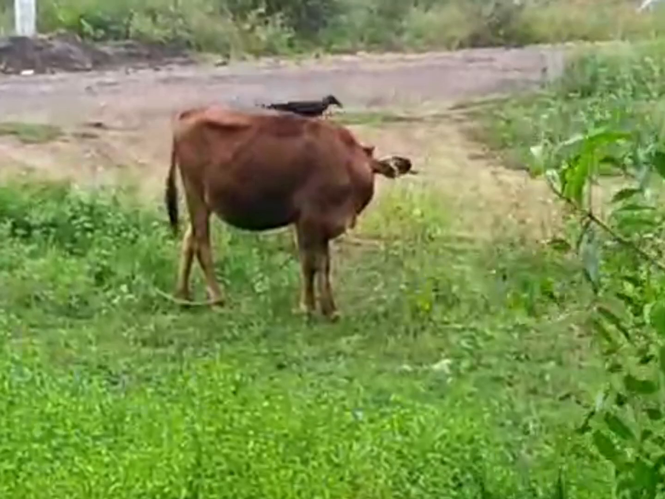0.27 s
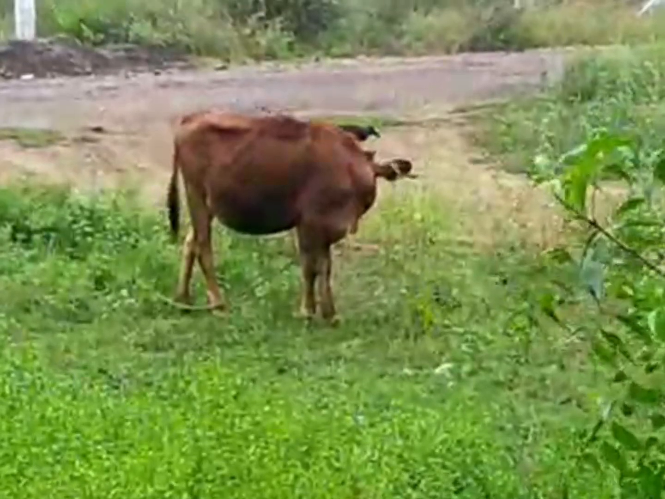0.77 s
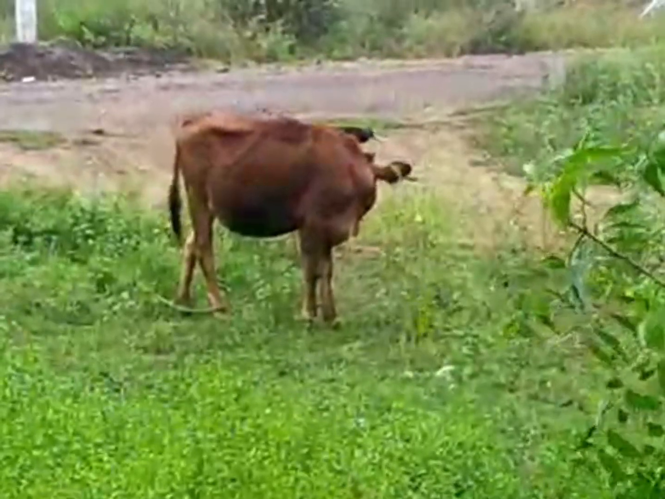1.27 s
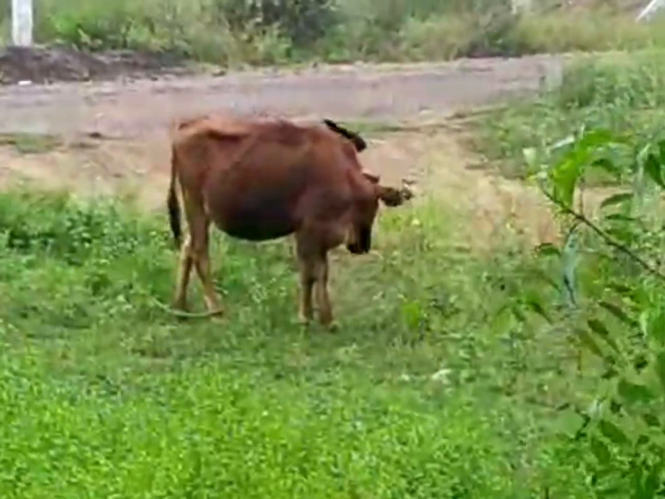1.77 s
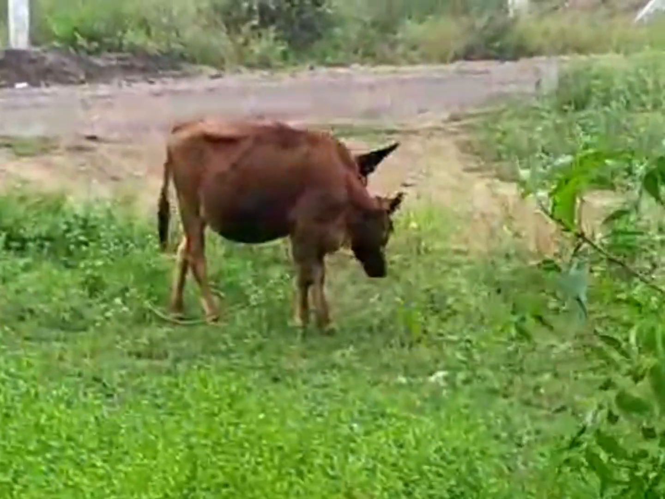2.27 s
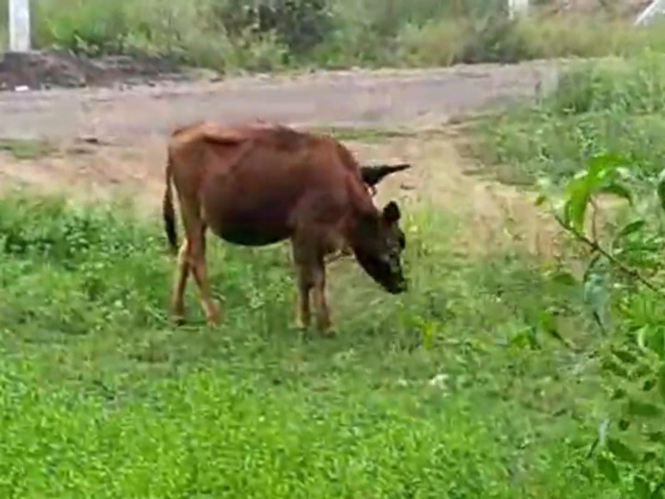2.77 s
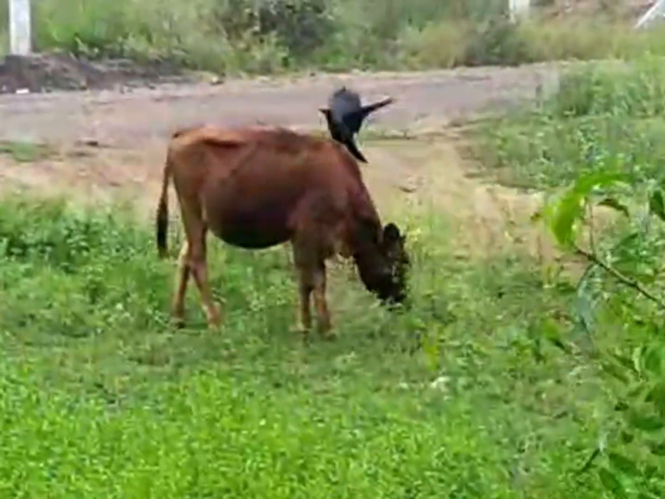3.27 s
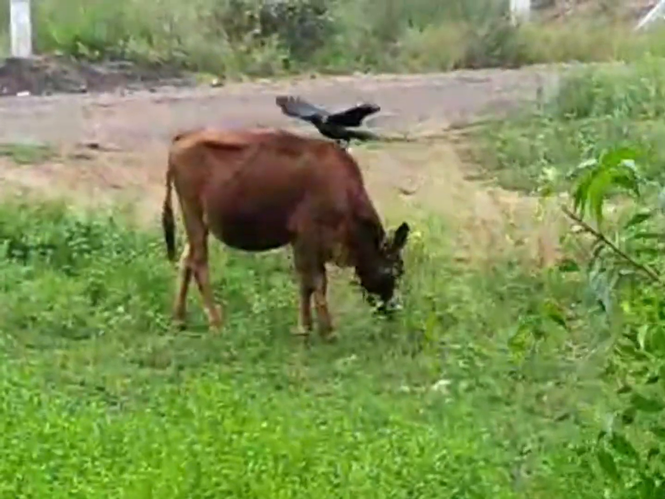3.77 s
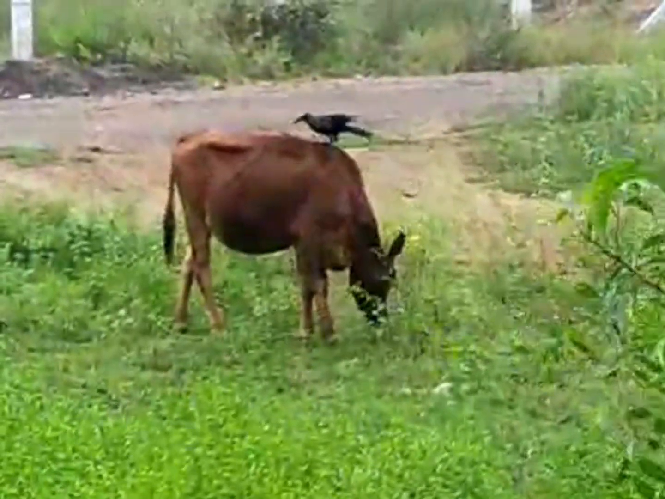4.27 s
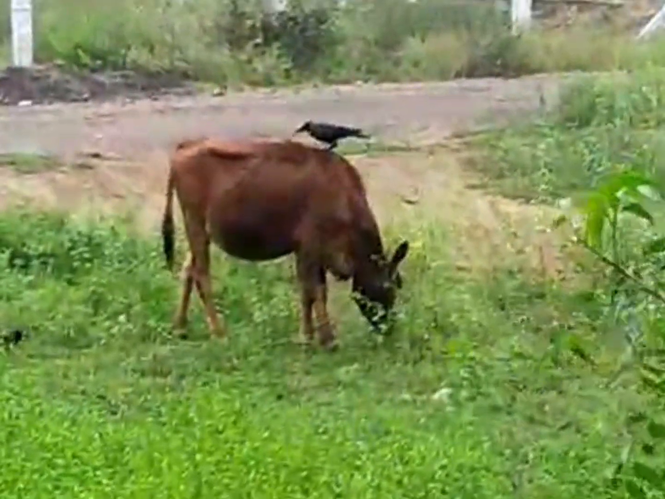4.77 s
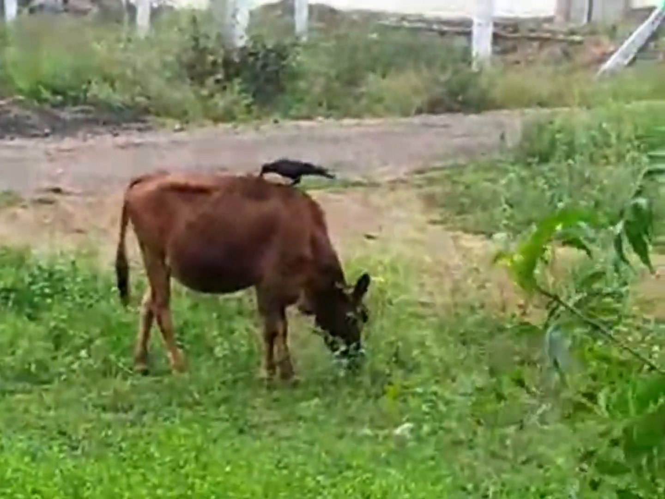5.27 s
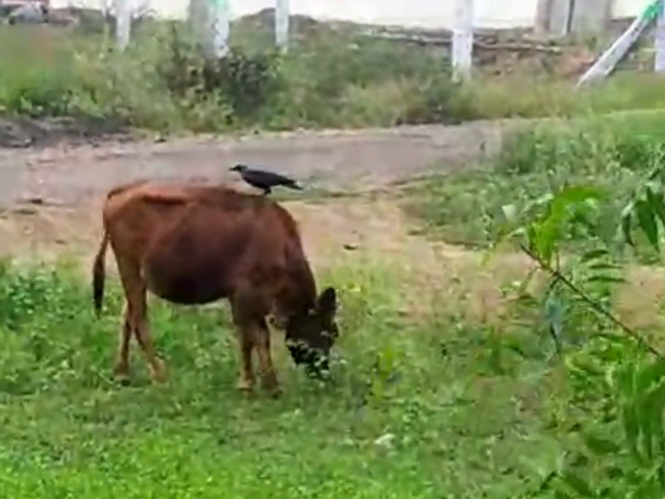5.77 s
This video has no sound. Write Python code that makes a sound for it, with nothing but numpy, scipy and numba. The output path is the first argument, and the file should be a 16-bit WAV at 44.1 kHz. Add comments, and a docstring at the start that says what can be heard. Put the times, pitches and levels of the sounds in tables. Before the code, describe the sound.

A steady, high hiss of insects fills an open grassy field for all six seconds, over the slow, low throb of a heavy engine some way off. Small birds give faint, short whistles during the first 1.5 seconds. Close by, water drips at irregular moments, making hollow plinks and small crackles on leaves; the clearest plinks fall near 2, 2.5 and 3.4 seconds. Wind touches the microphone lightly at first, then buffets it with deep, hard thumps from about 2.6 to 4.7 seconds. The engine grows louder from around 3.7 seconds, its roar becoming brighter as the vehicle nears. A brief leafy spatter comes at about 4.3 seconds. In the last second the wind eases, the insects swell briefly, and faint whines and a few short, raspy bird calls sound over the engine.

```python
"""A slow, heavy engine throbs under a hissing chorus of insects, in a grassy field after rain.
Both are pulse trains driving resonators: firings ring an exhaust, wing clicks ring wings. Small birds
whistle far off, and water drips close by, exciting the modes of something hollow and crackling on
leaves. The vehicle's roar grows louder and brighter as it nears, while eddies of wind buffet and thump
the two ports of a small microphone."""
import sys
import numpy as np
from scipy import signal
from scipy.fft import rfft, irfft
from scipy.io import wavfile
from scipy.ndimage import uniform_filter1d
from numba import njit

SR = 44100
rng = np.random.default_rng(int(sys.argv[2]) if len(sys.argv) > 2 else 0)


def transcribe(signal):
    """Save signal, clipped to [-1, 1], as a 16-bit WAV file at the path in sys.argv[1]."""
    frames = np.atleast_2d(signal).T
    limited = np.clip(frames, -1, 1)
    pcm = np.round(limited * 32767).astype(np.int16)
    wavfile.write(sys.argv[1], SR, pcm)


N = 266055
T = np.arange(N) / SR
HZ = np.maximum(np.arange(N // 2 + 1) * SR / N, 1)

# The engine under changing load. Each row: time in seconds, level in dB, exhaust resonance in Hz.
ENGINE_LOAD = [(0.08, -26, 99.4), (0.5, -24.5, 109.7), (1.25, -28.5, 102.8), (1.4, -24, 79.7),
               (1.65, -23.5, 78), (1.85, -31.5, 79.1), (2.15, -29.5, 101.6), (2.6, -28, 102.4),
               (3.4, -28.5, 83.4), (3.6, -23, 80.2), (3.8, -17, 80.6), (4.25, -16.5, 78.7),
               (4.45, -19, 96.7), (4.75, -23, 103), (4.95, -17.5, 101.9), (5.4, -18.5, 102.2),
               (5.75, -16, 101.3), (6.03, -19, 99.3)]
# Wing resonances. Each row: centre in Hz, width in Hz, relative level in dB, depth of throb in dB.
WING_MODES = [(6727, 650, -2, .8), (7240, 600, -6, .8), (5200, 600, -15, 1.8)]
# Envelopes of the insects, the roar and the wet leaves. Each row: time in seconds, level in dB.
CHORUS_LEVEL = [(0.1, -36.5), (1.3, -36.5), (2.2, -36), (2.7, -34.5), (4.9, -35.5), (5.4, -31),
                (5.75, -34.5), (6.03, -38.5)]
ROAR_LEVEL = [(0.3, -37.5), (2.09, -36), (2.41, -31.5), (3.4, -30.5), (4.03, -27), (4.55, -26), (4.9, -25),
              (5.4, -25), (5.75, -24), (5.9, -24), (6.03, -23)]
LEAF_LEVEL = [(0.3, -51.5), (2.0, -51.5), (3.6, -47.5), (4.1, -44.5), (4.8, -42), (5.15, -40), (6.03, -40)]
# Noise spectra of field, roar and leaves. Each row: frequency in Hz, relative spectral density in dB.
FIELD_SPECTRUM = [(24, -36), (40, -29), (91, -4.5), (131, -7), (250, -20), (400, -20), (900, -30),
                  (1400, -37.5), (2500, -33.5), (3200, -41), (4300, -43), (5200, -44.5), (5900, -43.5),
                  (8300, -64), (9000, -90)]
ROAR_SPECTRUM = [(59, -42), (110, -14), (170, -13.5), (250, -20.5), (500, -26), (700, -21.5), (900, -23.5),
                 (1200, -20), (1800, -23), (2500, -22.5), (3300, -30.5), (4500, -31), (5700, -35.5),
                 (6900, -31), (8300, -45.5), (9000, -80)]
LEAF_SPECTRUM = [(9000, -56), (10300, -18.5), (10900, -13.5), (11500, -11.5), (12500, -8), (13500, -7.5),
                 (15500, -8)]
# Resonant vehicle panels. Each row: centre in Hz, width in Hz, level against the roar in dB.
PANEL_MODES = [(395, 100, -16), (657, 34, -18), (1334, 18, -23.5), (1552, 30, -28), (1663, 25, -23),
               (1862, 45, -19), (1940, 35, -21), (2177, 87, -15), (2393, 68.2, -24.5)]
# Stereo width of the background noise: narrow in the bass, almost mono near 12 kHz.
# Each row: frequency in Hz, side minus mid in dB.
SIDE_SPECTRUM = [(60, -9.5), (110, -18.5), (200, -7), (380, -8), (700, -7), (1290, -3), (2380, -4.5),
                 (4400, 0.5), (7500, -1), (9000, -3), (12000, -37), (13500, 1)]
# Buffets of wind. Each row: time of full strength in seconds, level in dB, hold in seconds.
WIND_BUFFETS = [(0.21, -34, .02), (0.48, -25, .02), (0.85, -25.5, 0.061), (1.595, -27, 0.015),
                (2.35, -23, 0.18), (2.653, -18.5, 0.11), (2.95, -18.5, .01), (3.083, -18, .05),
                (3.273, -20.5, 0.18), (3.495, -17, 0.015), (3.862, -17.5, 0.06), (4.183, -21, 0.0083),
                (4.388, -23, 0.026), (4.557, -16.5, 0.11), (5.048, -23, 0.029), (5.657, -27, 0.069),
                (5.959, -35, 0.017)]
# Bird whistles. Each row: start and length in seconds, first, turning and last pitch in Hz,
# level in dB, how far to the side from 0 to 1.
BIRD_WHISTLES = [(0.105, .03, 3400, 3400, 3400, -48, 0), (0.415, .035, 4900, 4850, 4350, -53, 0),
                 (0.803, .03, 4200, 4450, 5750, -47, 0), (0.815, .026, 4300, 4450, 5150, -50, 0),
                 (0.96, .062, 2850, 2900, 3250, -41, 1), (0.985, .022, 4300, 4400, 4650, -51, 0),
                 (1.018, .15, 3150, 3750, 2250, -38.5, 1), (1.028, .028, 6250, 6270, 6300, -44, 0),
                 (1.185, .032, 4500, 4450, 4050, -50, 1), (1.52, .035, 1900, 1980, 2300, -44, 0),
                 (1.59, .02, 2300, 2320, 2400, -45, 0)]
# Delay of a call from the side. Each row: frequency in Hz, phase lag at the right port in radians.
SIDE_PHASE_LAG = [(2400, 1.0), (2900, 1.4), (3150, 2.7), (3700, 2.1)]
# Drips on a hollow body. Each row: start in seconds, level in dB, pitch in Hz, ring t60 in seconds,
# left minus right in dB, then knock, snap and echo in dB against the ring.
HOLLOW_DRIPS = [(0.3431, -26.5, 2270, .04, 1, -8, -4, -9.5), (0.4878, -21, 3130, 0.032, -6, 0, 0, -12.5),
                (1.466, -20.5, 2640, 0.08, 8, 3.5, -12, -7.5), (1.5766, -27, 2290, .045, 0, -6, -6, -14),
                (1.9597, -12.5, 2090, 0.044, -6, 5.5, 5, -10.5),
                (2.2192, -29.5, 2400, 0.078, -2, -9, -5, -18),
                (2.4845, -11.5, 2458, 0.062, -12, -2, -1, -10.5),
                (3.443, -11.5, 2275, 0.06, 2, -0.5, -17, -15), (3.747, -24.5, 2430, 0.038, -2, -6, -4, -6),
                (4.118, -19, 2178, 0.039, 3, -6, -1, -28), (4.924, -20, 3120, 0.037, -2, -6, -4, -22),
                (5.4128, -33, 2306, 0.054, -7, -6, -13, -14)]
# Drops on leaves. Each row: start in seconds, level in dB, spatter against snap in dB,
# body against bright band in dB.
LEAF_CRACKLES = [(0.3549, -40, -10, -19), (0.4871, -38, -8, -12), (0.973, -34, -12, 1),
                 (1.0096, -22.5, -8, -11), (1.0692, -35, -15, -16), (1.4658, -30, -17, -18),
                 (1.9594, -34, -5, 4), (2.27, -25.5, -5.5, -21), (2.4844, -30, -9, -1),
                 (2.8093, -37, -8, -12), (2.9485, -29, -12, -16), (3.4425, -29, -13, -10),
                 (3.933, -23, -15, -19), (4.3414, -34, 6, -4), (4.422, -29, -8, 3), (4.925, -28, -9, -3),
                 (5.2746, -31, -12, -17), (5.409, -38, -4, 5)]
# Narrow bands that swell and fade: faint far whines, brief cricket bands near 2.8 and 4.2 kHz, a swell of the
# insects near 5.2 kHz, and, late, clatter resonances of the nearing vehicle. Each row: start and length in
# seconds, centre and width in Hz, level in dB.
NARROW_BANDS = [(0.792, 0.41, 2880, 160, -46.5), (1.032, 0.49, 867, 21.9, -44.5),
                (2.056, 0.068, 2820, 140, -46), (2.116, 0.27, 796, 25, -41), (2.117, 0.37, 870, 22, -41),
                (2.171, 0.19, 4170, 200, -54), (2.4, 1.8, 5200, 500, -51.5), (2.648, 1.14, 1900, 120, -43.5),
                (4.986, 0.3, 1855, 40.12, -35.5), (5.555, 0.18, 2424, 119.3, -31),
                (5.78, 0.26, 2526, 120, -30.5), (5.83, 0.2, 1330, 70, -32)]
# Bird rasps. Each row: start in seconds, level in dB, centre and width in Hz, t60 in seconds.
BIRD_RASPS = [(1.02, -40, 2620, 200, .2), (1.465, -38, 5350, 300, .2), (3.755, -30, 5050, 600, .2),
              (5.412, -31, 3800, 1200, .08), (5.595, -33, 4000, 1200, .08), (5.813, -26, 5000, 700, .45),
              (5.893, -30, 4750, 150, .3)]
# Hard thumps within the buffets. Each row: start in seconds, peak in dB, pitch in Hz.
WIND_THUMPS = [(2.648, -10.5, 71), (2.707, -12.5, 80.5), (2.757, -13, 75), (2.792, -6.5, 83),
               (2.955, -21, 62), (3.084, -6.5, 66), (3.288, -6.5, 90), (3.368, -5.5, 72.5),
               (3.498, -12.5, 82.4), (3.762, -10, 76), (3.899, -4.5, 84.5), (4.172, -4.5, 99.5),
               (4.328, -7, 83.8), (4.379, -8, 86), (4.57, -11.5, 91.6), (4.609, -8, 88.5),
               (4.668, -9.5, 83)]


def undb(db):
    """Amplitude ratio of a level in dB."""
    return 10 ** (np.asarray(db) / 20)


def unit(x):
    """Normalisation to an rms of 1."""
    return x / np.sqrt(np.mean(x ** 2))


def curves(table):
    """Linear interpolation of a table's columns over time, one value a sample."""
    times, *columns = np.transpose(table)
    return [np.interp(T, times, column) for column in columns]


def gain_at(spectrum):
    """Gain at each FFT bin, interpolated in dB over log frequency."""
    hz, db = np.transpose(spectrum)
    return undb(np.interp(np.log(HZ), np.log(hz), db))


def walk(rate):
    """Slow random modulation: `rate` steps a second, smoothed twice, with deviation near 1."""
    hold = int(SR / rate)
    steps = np.repeat(rng.standard_normal(N // hold + 1), hold)
    return 1.816 * uniform_filter1d(uniform_filter1d(steps, hold), hold)[:N]


def spread(mid, side):
    """Mid-side stereo: sum and difference of unrelated sounds, with a width that varies with frequency."""
    side = irfft(rfft(side) * gain_at(SIDE_SPECTRUM), N)
    return np.array([mid + side, mid - side])


def pan(db):
    """Left and right gains for a level difference between the ports."""
    return undb(np.array([[db], [-db]]) / 2)


@njit
def moving_ring(x, hz, width_hz):
    """A second-order resonator (state-variable band-pass) with gain 1 at its moving centre."""
    y, band_state, low_state = np.empty(len(x)), 0., 0.
    for i in range(len(x)):
        g, damping = np.tan(np.pi * hz[i] / SR), width_hz / hz[i]
        band = (band_state + g * (x[i] - low_state)) / (1 + g * (g + damping))
        band_state, low_state = 2 * band - band_state, low_state + 2 * g * band
        y[i] = damping * band
    return y


def ring(x, hz, width_hz):
    """A resonator of constant frequency."""
    return moving_ring(x, np.full(len(x), float(hz)), float(width_hz))


def ring_twice(x, hz, width_hz, widen=1):
    """Two resonators in cascade give steeper skirts; the result has an rms of 1."""
    return unit(ring(ring(x, hz, width_hz), hz, widen * width_hz))


def decay(t, t60):
    """Exponential damping: 60 dB in t60 seconds."""
    return undb(-60 * t / t60)


def swell(start, length, edge_share):
    """A trapezoidal envelope that rises, holds and falls."""
    return np.clip(np.minimum(T - start, start + length - T) / (edge_share * length), 0, 1)


def add(out, start, sound):
    """Superposition of a short sound from `start` seconds on."""
    i = int(start * SR)
    n = min(sound.shape[-1], N - i)
    out[:, i:i + n] += sound[..., :n]


def hiss(spectrum, flicker_db, flicker_rate):
    """Broadband noise whose half-octave bands are modulated independently."""
    noise = rfft(rng.standard_normal((2, N))) * gain_at(spectrum)
    out = 0
    for octave in np.arange(np.log2(spectrum[0][0]), np.log2(spectrum[-1][0]) + .5, .5):
        band = np.clip(1 - 2 * np.abs(np.log2(HZ) - octave), 0, 1)
        out = out + irfft(noise * band, N) * undb(flicker_db * walk(flicker_rate))
    return spread(*unit(out))


def engine(inertia_s=.2924, jitter=.004, width_hz=22., overtone_hz=115, overtone_db=-11):
    """Forced resonance: firings ring the exhaust; load lowers its pitch and slows the firings."""
    db, pipe_hz = curves(ENGINE_LOAD)
    target_rate = np.interp(pipe_hz, [80, 100], [19.1, 20.7])  # firings a second, loaded to free
    lag = np.exp(-1 / (inertia_s * SR))
    rate = target_rate[0] + signal.lfilter([1 - lag], [1, -lag], target_rate - target_rate[0])
    cycle = np.floor(np.cumsum(rate * (1 + jitter * walk(10))) / SR)
    firings = np.diff(cycle, prepend=0)
    boom = moving_ring(moving_ring(firings, pipe_hz, width_hz), pipe_hz, 2 * width_hz)
    overtones = ring_twice(ring(firings, overtone_hz, width_hz=120), overtone_hz, width_hz=120)
    return undb(db) * (unit(boom) + undb(overtone_db) * overtones)


def insects(clicks_per_s=4000, scatter_db=2):
    """Shot noise: countless clicks ring wing resonances, and each kind of insect throbs on its own."""
    pair = np.zeros((2, N))
    for hz, width_hz, db, throb_db in WING_MODES:
        throb = undb(db + throb_db * walk(14))
        for channel in pair:
            hits = rng.random(N) < clicks_per_s / SR
            clicks = hits * undb(scatter_db * rng.exponential(size=N)) * rng.choice([-1, 1], N)
            channel += throb * ring_twice(clicks, hz, width_hz, widen=1.34)
    return spread(*unit(pair)) * undb(curves(CHORUS_LEVEL)[0])


def field(db=-27):
    """Ambient noise: the steady, bass-heavy background of the open field."""
    return undb(db) * hiss(FIELD_SPECTRUM, flicker_db=.72, flicker_rate=10) * pan(.5)


def roar(waver_db=3, air_hz=1500, near_db=-24.5, treble_db_per_db=2):
    """Air absorption: the noise of tyres, fan and resonant panels is duller while the vehicle is far."""
    db = curves(ROAR_LEVEL)[0]
    noise = hiss(ROAR_SPECTRUM, flicker_db=1.2, flicker_rate=18)
    for hz, width_hz, panel_db in PANEL_MODES:
        panel = [unit(ring(n, hz, width_hz)) for n in rng.standard_normal((2, N))]
        noise += undb(panel_db + waver_db * walk(2.95)) * spread(*panel)
    treble = signal.sosfiltfilt(signal.butter(1, air_hz, "high", fs=SR, output="sos"), noise)
    treble_gain = undb(treble_db_per_db * (db - near_db))
    return (noise - treble + treble_gain * treble) * undb(db) * pan(1)


def wet_leaves():
    """High-frequency noise: the fine hiss of wet leaves, slowly growing."""
    return undb(curves(LEAF_LEVEL)[0]) * hiss(LEAF_SPECTRUM, flicker_db=.7, flicker_rate=14)


def wind(centre_hz=66, width_hz=60, rise_db_per_s=173, fall_db_per_s=153, lull_db=-30.5):
    """Turbulent pressure: eddies push on both ports alike, in buffets that rise, hold and fall."""
    eddies = ring_twice(rng.standard_normal(N), centre_hz, width_hz)
    levelled = eddies / np.sqrt(uniform_filter1d(eddies ** 2, SR // 16))
    onset, top_db, hold = np.transpose(WIND_BUFFETS)[:, :, None]
    before, after = np.maximum(onset - T, 0), np.maximum(T - onset - hold, 0)
    buffet_db = top_db - rise_db_per_s * before - fall_db_per_s * after
    return levelled * undb(np.maximum(buffet_db.max(axis=0), lull_db))


def bird_whistles(turn_share=.13, pitch_jitter=.007, waver_db=2):
    """Frequency modulation: gliding tones, which from the side reach the two ports out of phase."""
    out = np.zeros((2, N))
    for start, length, first_hz, turn_hz, last_hz, db, aside in BIRD_WHISTLES:
        hz = np.interp(T, start + length * np.array([0, turn_share, 1]), [first_hz, turn_hz, last_hz])
        hz = uniform_filter1d(hz, int(.2 * length * SR))  # rounds the turn
        phase = 2 * np.pi * np.cumsum(hz * (1 + pitch_jitter * walk(200))) / SR
        amplitude = np.sqrt(2) * undb(db + waver_db * walk(100))  # the air between smears the level
        lag = aside * np.interp(hz, *np.transpose(SIDE_PHASE_LAG))
        out += amplitude * swell(start, length, edge_share=.05) * np.sin([phase, phase - lag])
    return out


def drips(upper_ratio=1.18, upper_db=-18, knock_ratio=1.083, snap_hz=4000, skirt_db=-5):
    """Impact excitation: a snap, a knock and two damped modes, then echoes scattered from nearby."""
    out = np.zeros((2, N))
    t = T[:SR // 2]
    for start, db, hz, t60, pan_db, knock_db, snap_db, echo_db in HOLLOW_DRIPS:
        phase = 2 * np.pi * hz * t
        modes = (np.sin(phase) + undb(upper_db) * np.sin(upper_ratio * phase)) * decay(t, t60)
        knock = undb(knock_db) * np.sin(knock_ratio * phase) * decay(t, t60=.015)
        snap = undb(snap_db) * np.sin(2 * np.pi * snap_hz * t) * decay(t, t60=.0034)
        direct = (modes + knock + snap) * np.minimum(t / .0008, 1) * pan(pan_db)
        noise = rng.standard_normal((2, len(t)))
        scatter = np.array([ring_twice(n, 1.03 * hz, width_hz=300) for n in noise]) * decay(t, t60=.26)
        skirt = np.array([ring_twice(n, 1.19 * hz, width_hz=1600) for n in noise]) * decay(t, t60=.25)
        echoes = undb(echo_db) * (scatter + undb(skirt_db) * skirt) * np.minimum(t / .0033, 1)
        # a small hollow radiates little below its lowest mode
        radiation = signal.butter(4, .85 * hz, "high", fs=SR, output="sos")
        add(out, start, undb(db) * signal.sosfilt(radiation, direct + echoes))
    return out


def crackles(snap_t60=.0064, spatter_t60=.1):
    """Brief impacts have wide spectra: each drop on a leaf gives a bright snap and a short spatter."""
    out = np.zeros((2, N))
    t = T[:SR // 2]
    for start, db, spatter_db, body_db in LEAF_CRACKLES:
        bright = unit(ring(rng.standard_normal(len(t)), hz=12500, width_hz=11000))
        body = unit(ring(rng.standard_normal(len(t)), hz=5000, width_hz=3400))
        envelope = decay(t, snap_t60) + undb(spatter_db) * decay(t, spatter_t60)
        add(out, start, undb(db) * (bright + undb(body_db) * body) * envelope)
    return out


def whines():
    """Narrow-band noise is heard as a wavering pitch; each band swells and fades."""
    out = 0
    for start, length, hz, width_hz, db in NARROW_BANDS:
        band = ring_twice(rng.standard_normal(N), hz, width_hz, widen=2)
        out = out + band * undb(db) * swell(start, length, edge_share=.22)
    return out * pan(2)


def bird_rasps():
    """Damped band noise: short, rough calls, uncorrelated between the ports."""
    out = np.zeros((2, N))
    t = T[:SR // 2]
    for start, db, hz, width_hz, t60 in BIRD_RASPS:
        bands = np.array([ring_twice(n, hz, width_hz) for n in rng.standard_normal((2, len(t)))])
        add(out, start, undb(db) * decay(t, t60) * bands)
    return out


def wind_thumps(rise_s=.014, t60=.1):
    """Damped oscillation: a push of air on both ports swings a few times and dies."""
    out = np.zeros((2, N))
    t = T[:SR // 2]
    envelope = np.minimum(t / rise_s, 1) * decay(t - rise_s, t60)
    for start, db, hz in WIND_THUMPS:
        add(out, start, undb(db) * np.sin(2 * np.pi * hz * t) * envelope)
    return out


def rustle(start=4.33, db=-23.5, body_db=-7, rise_s=.016, t60=.28):
    """A noise transient: two broad bands rise and decay together as one bright spatter."""
    out = np.zeros((2, N))
    t = T[:SR // 2]
    bright = unit(ring(rng.standard_normal(len(t)), hz=13500, width_hz=6000))
    body = unit(ring(rng.standard_normal(len(t)), hz=5500, width_hz=4000))
    envelope = np.minimum(t / rise_s, 1) ** 2 * decay(t, t60)
    add(out, start, undb(db) * (bright + undb(body_db) * body) * envelope)
    return out


def scene(port_lag_s=5e-5):
    """Superposition at the ports; field and roar come from one side and reach the right port later."""
    far = field() + roar()
    far[1] = np.roll(far[1], round(port_lag_s * SR))
    continuous = engine() + insects() + far + wet_leaves() + wind()
    events = bird_whistles() + drips() + crackles() + whines() + bird_rasps() + wind_thumps() + rustle()
    return continuous + events


def record(dry, start_s=.0775, bottom_hz=50, gap_hz=(8120, 10300), top_hz=15600):
    """Band limiting: after a short silence, filters remove deep bass, a treble band and the very top."""
    opened = dry * np.clip((T - start_s) / .001, 0, 1)
    filters = np.vstack([signal.butter(4, bottom_hz, "high", fs=SR, output="sos"),
                         signal.ellip(6, .3, 60, gap_hz, "bandstop", fs=SR, output="sos"),
                         signal.ellip(12, .2, 80, top_hz, fs=SR, output="sos")])
    return signal.sosfilt(filters, opened)


dry = scene()
out = record(dry)
transcribe(out)
```